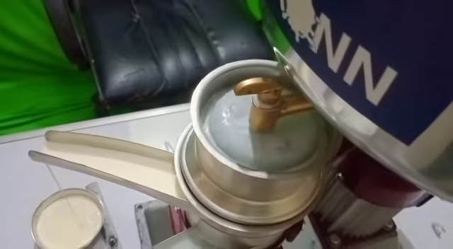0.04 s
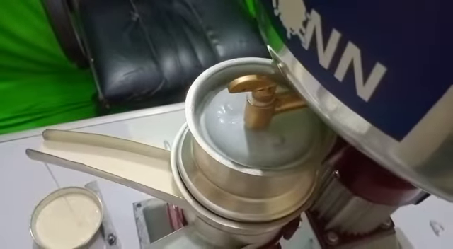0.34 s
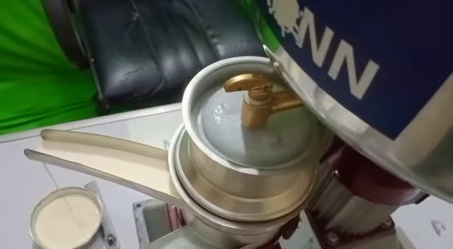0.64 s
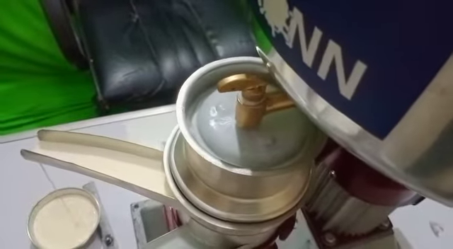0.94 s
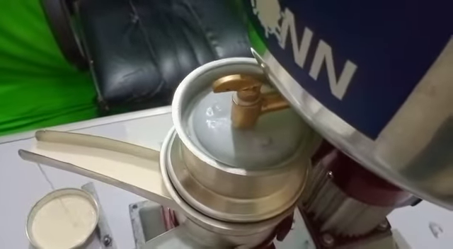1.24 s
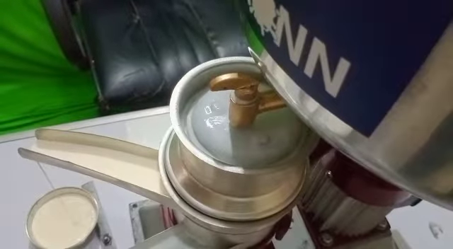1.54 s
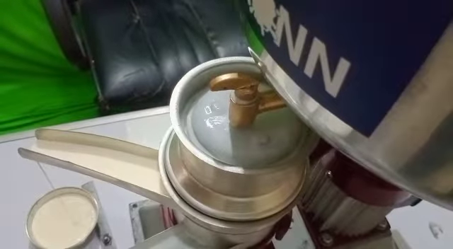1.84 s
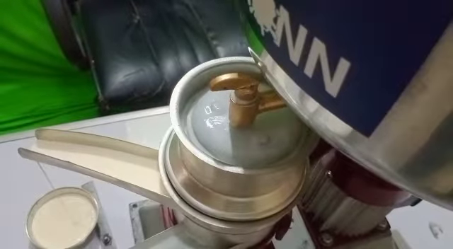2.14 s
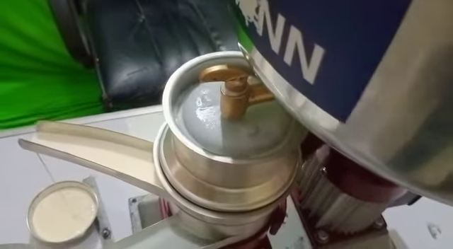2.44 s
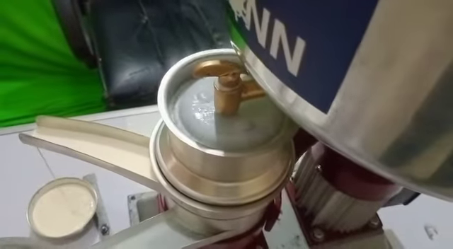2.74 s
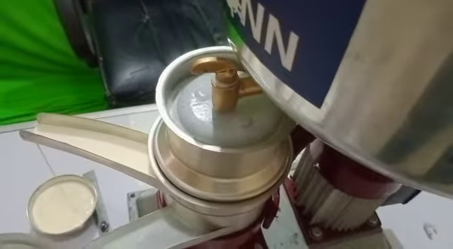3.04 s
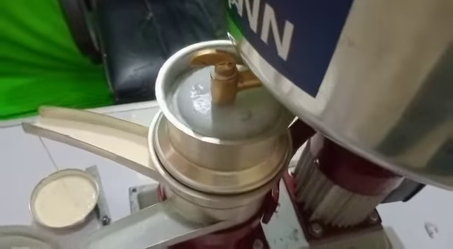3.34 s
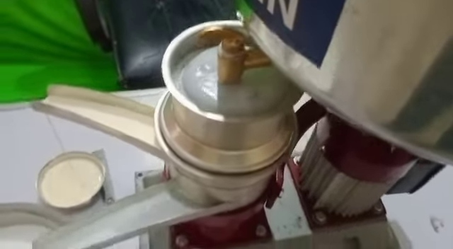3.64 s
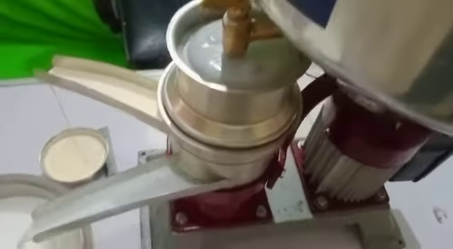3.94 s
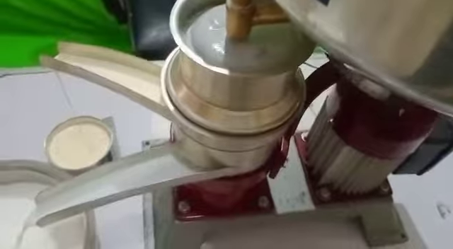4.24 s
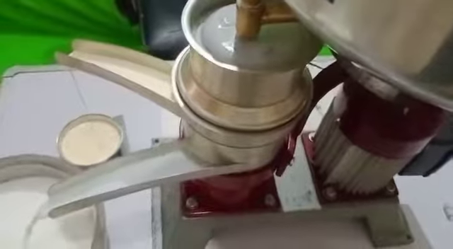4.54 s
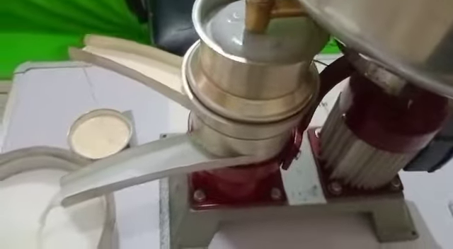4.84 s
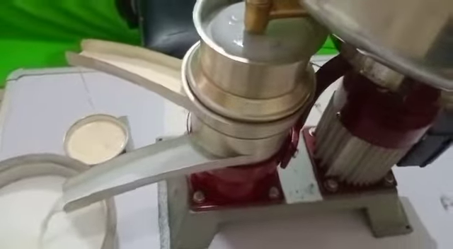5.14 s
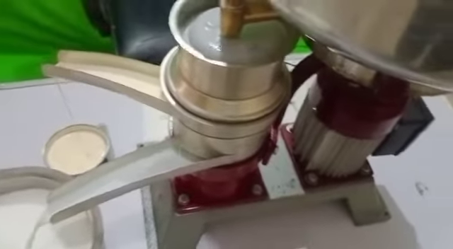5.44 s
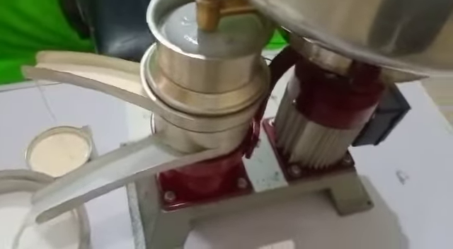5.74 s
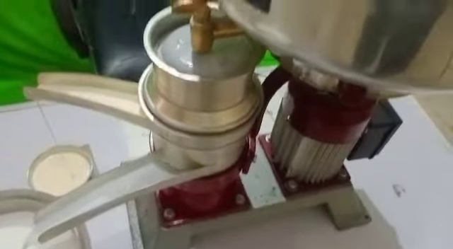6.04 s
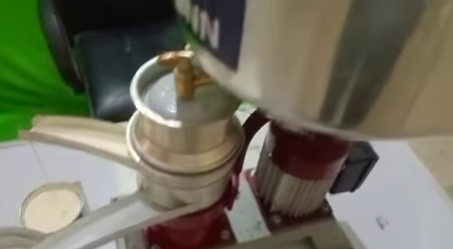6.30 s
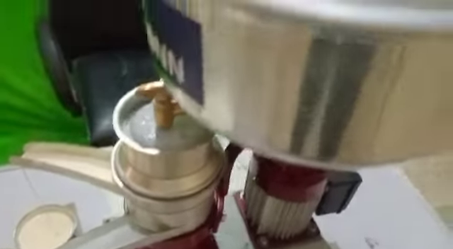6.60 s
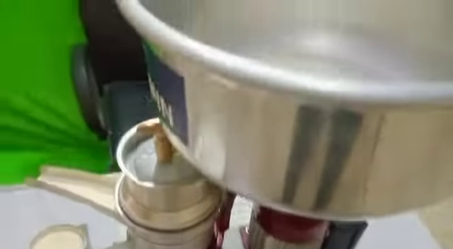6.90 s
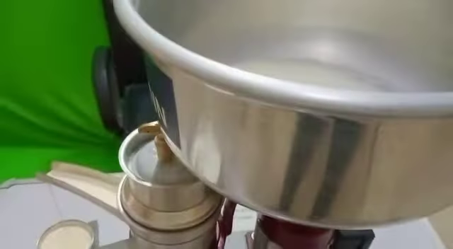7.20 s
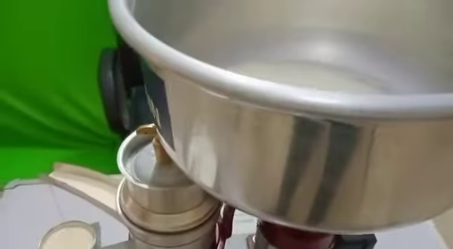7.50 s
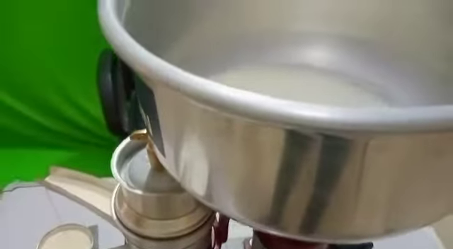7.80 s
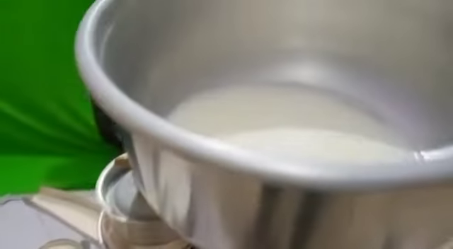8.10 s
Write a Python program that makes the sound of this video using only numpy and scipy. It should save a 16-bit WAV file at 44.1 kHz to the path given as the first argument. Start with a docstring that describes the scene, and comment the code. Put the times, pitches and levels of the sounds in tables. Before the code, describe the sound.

Steady motor hum and metallic bearing whine from a cream separator close by indoors, cutting out briefly and then resuming.

```python
"""An electric cream separator runs in a small room, close to one moving camera microphone.
Motor and bowl hum, the ball bearings whine and rattle in the metal covers, the spinning bowl hisses
and milk trickles through. The microphone travels from the spouts past the motor and up over the tank,
each ringing as it comes near. The sound drops out for a moment, then a hand bumps the camera twice."""
import sys
import numpy as np
from scipy import signal
from scipy.fft import rfft, irfft, next_fast_len
from scipy.io import wavfile
from scipy.ndimage import map_coordinates

SR = 44100
rng = np.random.default_rng(int(sys.argv[2]) if len(sys.argv) > 2 else 0)


def generate_wav(sig):
    """Save sig (samples, or channels by samples) to the path in sys.argv[1] as 16-bit PCM at SR."""
    pcm = np.round(np.clip(np.atleast_2d(sig).T, -1, 1) * 32767).astype(np.int16)
    wavfile.write(sys.argv[1], SR, pcm)


N = 364266


def amp(db):
    """Decibels to gain."""
    return 10 ** (np.asarray(db) / 20)


def unit(x):
    """x at rms 1."""
    return x / np.sqrt(np.mean(x ** 2) + 1e-20)


def clock():
    """The time of every sample in seconds."""
    return np.arange(N) / SR


def curves(rows):
    """One value per sample for each column after the time."""
    times, *columns = np.transpose(rows)
    return [np.interp(clock(), times, column) for column in columns]


def wobble(rate):
    """A smooth random curve, rate knots a second."""
    coarse = np.arange(0, N + 64, 64)
    knots = rng.standard_normal(4096)
    return np.interp(np.arange(N), coarse, map_coordinates(knots, [coarse * rate / SR], mode="wrap"))


def swell(at, half, db):
    """A bell-shaped rise and fall of gain."""
    return amp(db) * np.exp(-.5 * ((clock() - at) / half) ** 2)


def filtered(x, response):
    """x shaped by a gain that depends on frequency."""
    size = next_fast_len(N + SR // 2)
    return irfft(rfft(x, size) * response(np.fft.rfftfreq(size, 1 / SR)), size)[..., :N]


def at_mic(level_db, view):
    """A part's gain from where the microphone is."""
    base, by_motor, by_tank = level_db
    return amp(base + by_motor * view[0] + by_tank * view[1])


def tone(hz, run, scatter, rate):
    """A tone of rms 1 on the running time; a scattered part makes it waver."""
    phase = 2 * np.pi * (hz * run + rng.random())
    return unit((1 + scatter * wobble(rate)) * np.sin(phase) + scatter * wobble(rate) * np.cos(phase))


BOWL_HZ, BUZZ_HZ, DRIVE_HZ, GEAR_HZ = 164.2, 271, 432.7, 970.4
BALL_HZ, CAGE_HZ, BEAT_HZ = 506.2, 113.8, 121.8
THROB_HZ, THROB_CREST_S, THROB_DEPTH = 1.272, 0.57, 0.47
# Tones: level/dB at the spouts, change/dB facing the motor, change/dB over the tank
CAGE_DB, BUZZ_DB = (-48, -0.5, -3), (-45.5, -4, -0.5)
BOWL_DB, BALL_DB, THIRD_DB = (-49, -1.5, 2), (-47.5, 3.5, -1.5), (-45.5, -7.5, 2.5)
# Motor and frame hum, the same all round the machine: f/Hz, level/dB
FRAME_HUM = [(49.3, -75), (99.9, -58), (199.9, -58.5), (227.9, -69.5), (249.8, -57.5), (291.9, -56.5),
             (312.2, -56), (336.5, -59.5), (342.2, -50), (360.5, -56), (384.4, -50.5), (402.4, -53.5),
             (408.6, -53.5), (552.8, -61.5), (583.9, -56)]
# Whine of bearings and drive, the same all round: f/Hz, level/dB
BEARING_WHINE = [(1126.5, -48), (1167.5, -51.5), (1281.7, -55.5), (1395.6, -49.5), (1455.7, -56),
                 (1459.5, -53), (1632.5, -57), (1880, -55.5), (2025.1, -53), (2043.5, -49.5),
                 (2183.6, -48.5), (2303.0, -58), (2343.8, -49.5), (2417.3, -52.5), (2531.3, -45.5),
                 (2626.9, -51), (2740.9, -59.5), (2919.4, -48), (3037.7, -60.5), (3151, -51.5),
                 (3211.1, -47.5), (3430.3, -51), (3527, -53), (3795.4, -54), (4199, -54), (4558, -55),
                 (4673, -55), (4834, -57.5), (4947, -60)]
# Flares of the frame's buzz and one swell of the ball-pass tone: t/s, half length/s, level/dB
BUZZ_FLARES = [(.35, 0.26, -40.5), (1.01, .065, -32.5), (1.393, 0.062, -36.5), (2.47, .05, -36),
               (5.747, 0.08, -43), (6.494, 0.067, -40)]
BALL_PASS_SWELL = (3.95, 0.12, -37.5)
# The drive tone at the moving microphone: t/s, level/dB
DRIVE_AT_MIC = [(0, -38), (2.3, -41.5), (2.8, -37.5), (4.2, -42), (4.8, -40), (5.15, -35), (5.5, -39),
                (6.2, -39), (6.36, -43.5), (6.6, -41.5), (7.3, -41.5), (8.25, -45.5)]


def motor(run, view):
    """Hum, the bowl's tone throbbing as two close tones beat, and the whine, all locked to the same speed."""
    throb = 1 + THROB_DEPTH * np.cos(2 * np.pi * THROB_HZ * (clock() - THROB_CREST_S))
    buzz = np.hypot(at_mic(BUZZ_DB, view), sum(swell(*flare) for flare in BUZZ_FLARES))
    ball = np.hypot(at_mic(BALL_DB, view), swell(*BALL_PASS_SWELL))
    cage = at_mic(CAGE_DB, view)
    out = at_mic(BOWL_DB, view) * throb * tone(BOWL_HZ, run, scatter=.18, rate=5)
    out += buzz * tone(BUZZ_HZ, run, scatter=0.4, rate=14)
    out += amp(curves(DRIVE_AT_MIC)[0]) * tone(DRIVE_HZ, run, scatter=0.13, rate=8)
    out += ball * tone(BALL_HZ, run, scatter=0.3, rate=7.7)
    out += at_mic(THIRD_DB, view) * tone(3 * BALL_HZ, run, scatter=0.19, rate=5)
    out += amp(-50.5) * tone(GEAR_HZ, run, scatter=0.35, rate=8)
    out += cage * tone(CAGE_HZ, run, scatter=.06, rate=4.4)
    out += cage * amp(-0.5) * tone(BEAT_HZ, run, scatter=.15, rate=3.2)  # beats against the cage hum
    out += sum(amp(db) * tone(hz, run, scatter=0.19, rate=0.92) for hz, db in FRAME_HUM)
    return out + sum(amp(db) * tone(hz, run, scatter=0.34, rate=1.797) for hz, db in BEARING_WHINE)


def pitting(run, load_depth):
    """Every ball strikes the same pit; the load swings with cage and bowl, giving many fine lines."""
    when = np.arange(int(run[-1] * BALL_HZ)) / BALL_HZ
    load = np.cos(2 * np.pi * CAGE_HZ * when) + np.cos(2 * np.pi * BOWL_HZ * when)
    at = np.interp(when, run, np.arange(N))[:, None]
    taps = at.astype(int) + np.arange(-8, 9)
    ticks = np.exp(load_depth * load)[:, None] * np.sinc(taps - at)  # strikes fall between samples
    return unit(np.bincount(np.clip(taps, 0, N).ravel(), ticks.ravel(), N + 1)[:N])


def rolling(run, ball_depth, cage_depth, slip_depth):
    """Contact noise, pulsing as the balls pass and as the cage turns against both races."""
    pulse = lambda hz: np.cos(2 * np.pi * (hz * run + rng.random()))
    load = ball_depth * pulse(BALL_HZ) + cage_depth * pulse(CAGE_HZ)
    load += slip_depth * pulse(BOWL_HZ - CAGE_HZ)
    return unit(np.exp(load) * rng.standard_normal(N))


def room(x, wet_db, t60, places=7):
    """Each place on the microphone's path has its own wall reflections, so the fine colour drifts."""
    t = np.arange(SR // 4) / SR
    place = clock() / clock()[-1] * (places - 1)
    out = x.copy()
    for k in range(places):
        tail = rng.standard_normal(len(t)) * amp(-60 * t / t60) * (t > .002)
        share = np.cos(np.pi / 2 * np.clip(place - k, -1, 1))
        out += amp(wet_db) * share * signal.oaconvolve(x, tail / np.linalg.norm(tail))[:N]
    return out


# Resonances and dips of covers, spouts and tank, at every microphone position: f/Hz, width/Hz, lift/dB
COVER_MODES = [(1191, 200, 7.5), (1440, 200, 7), (1790, 120, -1), (2010, 110, 2.5), (2410, 110, 4.5),
               (2813, 70, 6), (3018, 170, 7), (3282, 60, 5), (3390, 87, 0), (3494, 180, 3.5),
               (4130, 120, 0), (4724, 380, 4.5), (4963, 120, 5), (5580, 120, 2.5), (7090, 150, 6),
               (7900, 170, 2.5), (10240, 250, 3), (10720, 200, 4), (11120, 220, 4.5), (11450, 200, -1),
               (11870, 220, 5), (12110, 170, 6.5), (13500, 500, 1.5)]


def radiated(x, spectrum):
    """x with a broad spectrum, lifted at the resonances of the metalwork; rms 1."""
    freqs, levels = np.transpose(spectrum)
    broad = lambda hz: np.interp(np.log(hz + 1), np.log(freqs), levels)
    lift = lambda hz: sum(db / (1 + (2 * (hz - centre) / width) ** 4) for centre, width, db in COVER_MODES)
    return unit(filtered(x, lambda hz: amp(broad(hz) + lift(hz))))


# Noise bands: level/dB at the spouts, change/dB facing the motor, change/dB over the tank
DRONE_DB, CLATTER_DB, RATTLE_DB = (-37, -2, -2.5), (-40, -0.7, -0.5), (-33.5, 0.3, 0.15)
HISS_DB, FIZZ_DB = (-36, 0.5, 0), (-44, -1.5, 0.5)
# Their spectra close to the machine, lowest band first: f/Hz, relative level/dB
DRONE_SPECTRUM = [(25, -36), (55, -39.5), (90, -14), (130, -9.5), (200, -2.5), (240, -6), (300, 0.5),
                  (420, 0.5), (520, -2), (640, -9.5), (850, -12.5), (1500, -51)]
CLATTER_SPECTRUM = [(400, -31.5), (650, -5.5), (850, 3), (1050, 0.5), (1300, -0.5), (1600, -3), (2200, -20)]
RATTLE_SPECTRUM = [(1200, -36), (1750, -7.5), (2200, 1.5), (3000, -1.5), (3700, 0), (4300, -6), (5000, -12),
                   (5400, -12), (6500, -15), (9000, -41.5)]
HISS_SPECTRUM = [(4500, -41), (6400, -17.5), (6700, -4.5), (7400, 0.5), (8000, -3), (9000, -4.5),
                 (9700, -9), (11000, -14.5), (13000, -34.5)]
FIZZ_SPECTRUM = [(9500, -21.5), (11500, -1), (13400, 2), (14400, -5.5), (15500, -8)]


def bearings(run, view):
    """A low drone shakes the frame; rolling noise rattles the covers and hisses on top."""
    ticks = amp(-13) * pitting(run, load_depth=0.93)
    contact = rolling(run, ball_depth=.1, cage_depth=0.093, slip_depth=0.031)
    coarse = room(contact + ticks, wet_db=-7, t60=0.32)
    fine_contact = rolling(run, ball_depth=.07, cage_depth=0.13, slip_depth=0.088)
    fine = room(fine_contact + ticks, wet_db=-7, t60=0.089)
    drone = at_mic(DRONE_DB, view) * radiated(rng.standard_normal(N), DRONE_SPECTRUM)
    clatter = at_mic(CLATTER_DB, view) * amp(.3 * wobble(6.5)) * radiated(contact, CLATTER_SPECTRUM)
    rattle = at_mic(RATTLE_DB, view) * amp(0.16 * wobble(14)) * radiated(coarse, RATTLE_SPECTRUM)
    hiss = at_mic(HISS_DB, view) * amp(.25 * wobble(16)) * radiated(fine, HISS_SPECTRUM)
    fizz = at_mic(FIZZ_DB, view) * radiated(fine, FIZZ_SPECTRUM)
    return drone + clatter + rattle + hiss + fizz


def whirr(modes):
    """Metal shaken without pause rings in narrow bands of noise."""
    def response(hz):
        return np.sqrt(sum(amp(db) ** 2 / width / (1 + (2 * (hz - centre) / width) ** 2) ** 2
                           for centre, width, db in modes))
    rms = np.sqrt(sum(amp(db) ** 2 for _, _, db in modes))
    return rms * unit(filtered(rng.standard_normal(N), response))


# Each part's ring, close up with the microphone straight at it: f/Hz, width/Hz, level/dB
SPOUT_MODES = [(1133, 25, -48), (1900, 100, -48), (2025, 49, -48), (2340, 60, -46), (3180, 60, -46),
               (3460, 110, -46), (5023, 90, -46)]
HOUSING_MODES = [(7000, 100, -61), (8200, 250, -46), (9900, 600, -51), (11100, 160, -59), (14200, 800, -51)]
TANK_MODES = [(1520, 15, -49), (2433, 45, -46), (2740, 90, -39), (3064, 23, -43), (3197, 50, -41),
              (3520, 130, -44), (7370, 100, -52), (12200, 140, -47.5), (13320, 450, -48)]


def metalwork(view, beaming=1.5):
    """Spouts, motor housing and tank ring; beaming sets how sharply each fades off the microphone."""
    by_motor, by_tank = view
    by_spouts = np.clip(1 - by_motor - by_tank, 0, 1)
    parts = (by_spouts, SPOUT_MODES), (by_motor, HOUSING_MODES), (by_tank, TANK_MODES)
    return sum(facing ** beaming * whirr(modes) for facing, modes in parts)


def milk(level_db, pitch_hz, cycles, spread_db, count=700):
    """The stream from the tap breaks into small drops and short bubbles of rising pitch."""
    t = np.arange(SR // 50) / SR
    start = rng.integers(0, N, (count, 1))
    hz = np.clip(pitch_hz * np.exp(0.62 * rng.standard_normal((count, 1))), 500, 11000)
    age = t * hz / cycles
    size = amp(spread_db * np.minimum(rng.exponential(size=(count, 1)), 4))
    rise = 1 + 0.024 * np.minimum(age, 5)
    drops = size * np.exp(-age) * np.sin(2 * np.pi * hz * t * rise)
    trickle = np.bincount((start + np.arange(len(t))).ravel(), drops.ravel(), N)[:N]
    return amp(level_db) * unit(trickle)


# Brief rings of the covers along the microphone's path: t/s, half length/s, f/Hz, level/dB
COVER_ZINGS = [(.5, 0.063, 3190, -51), (2.85, .15, 3000, -40), (3.5, .15, 2415, -38), (3.8, .1, 3210, -43),
               (5.0, 0.18, 2920, -40), (6.9, 0.46, 2420, -42)]


def zings():
    """Now and then one resonance of the covers sings out."""
    return sum(swell(at, half, db) * tone(hz, clock(), scatter=1.5, rate=40)
               for at, half, hz, db in COVER_ZINGS)


# Handling knocks, right at the microphone: t/s, level/dB
HAND_KNOCKS = [(2.326, -44), (2.443, -41)]


def handling(hz, decay_s):
    """The hand bumps the camera softly, each time a low, damped thud."""
    ages = [(np.maximum(clock() - at, 0), db) for at, db in HAND_KNOCKS]
    return sum(amp(db) * np.sin(2 * np.pi * hz * t) * np.exp(-t / decay_s) for t, db in ages)


# Bright band on the way up to the tank: f/Hz, width/Hz, relative level/dB
SHEEN_BAND = [(7700, 420, -4), (8000, 200, -6)]


def sheen():
    """A brief bright sheen as the microphone rises."""
    return swell(at=6.42, half=0.25, db=-38.5) * whirr(SHEEN_BAND)


# From the spouts past the motor and up over the tank: t/s, facing the motor/0-1, over the tank/0-1
MIC_PATH = [(1.4, 0, 0.11), (3.2, 0.17, 0.18), (3.9, 0.37, 0), (5.2, 1, 0.05), (6.1, 1, 0.4),
            (6.6, 0.67, 0.57), (7.2, .1, 0.95), (8.2, 0, 0.97)]


def scene():
    """The separator's speed wanders very slightly; one moving microphone feeds both channels."""
    speed = 1 + 0.0002944 * wobble(1.5) + 0.00039 * wobble(17)
    run = np.cumsum(speed) / SR  # the machine's running time/s
    view = np.clip(curves(MIC_PATH), 0, 1)
    mono = motor(run, view) + bearings(run, view) + metalwork(view) + zings() + sheen()
    mono += milk(level_db=-52.5, pitch_hz=3020, cycles=2.8, spread_db=4.5)
    mono += handling(hz=62, decay_s=.007)
    return np.array([mono, mono])


MUTE_FROM_S, MUTE_TO_S, TOP_HZ = 1.4552, 2.2005, 15520


def record(dry):
    """The sound is muted for a moment, and nothing is kept above the band limit."""
    live = (clock() < MUTE_FROM_S) | (clock() > MUTE_TO_S)
    return filtered(dry * live, lambda hz: np.clip((TOP_HZ - hz) / 120 + .5, 0, 1))


dry = scene()
out = record(dry)
generate_wav(out)
```